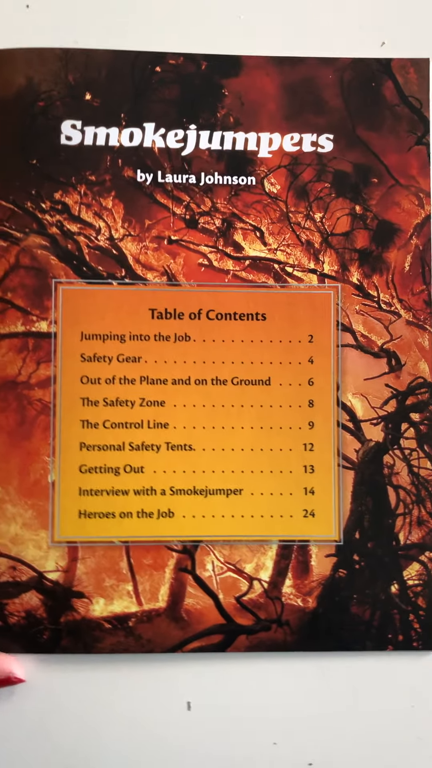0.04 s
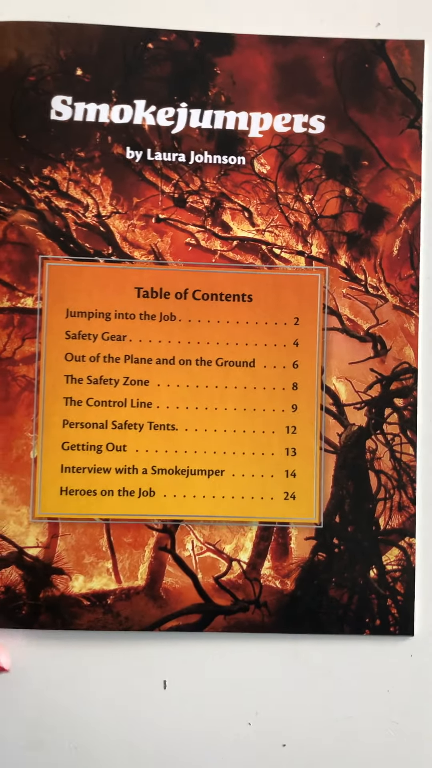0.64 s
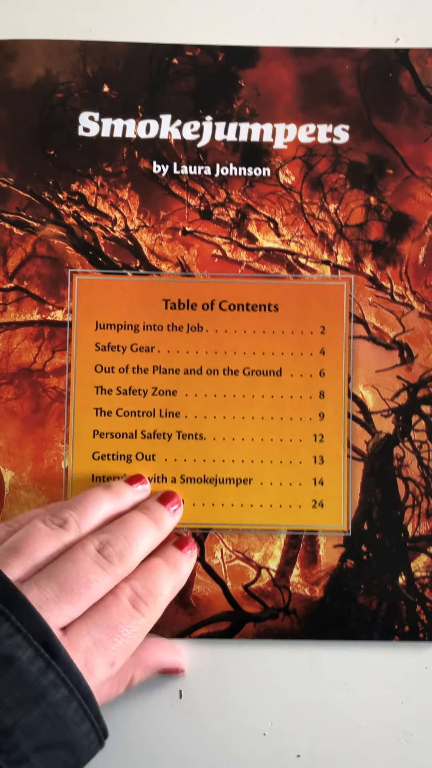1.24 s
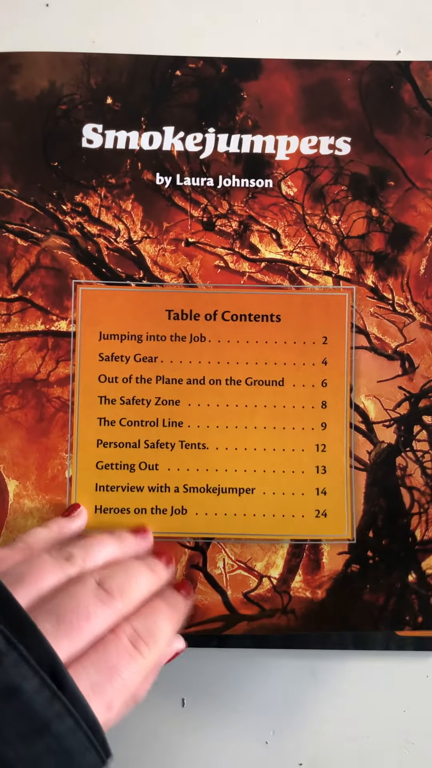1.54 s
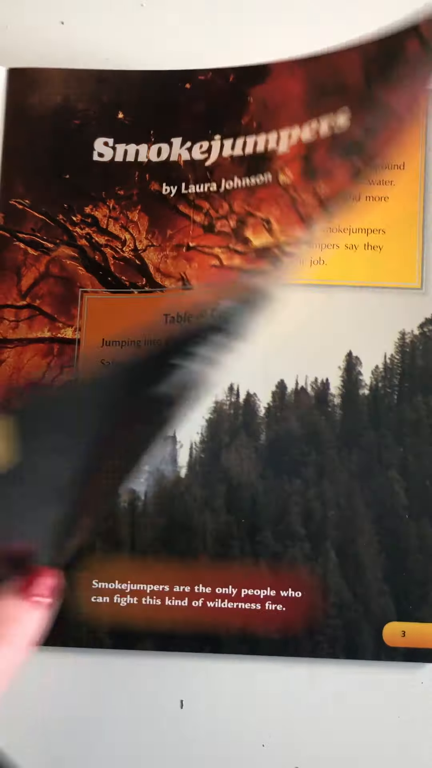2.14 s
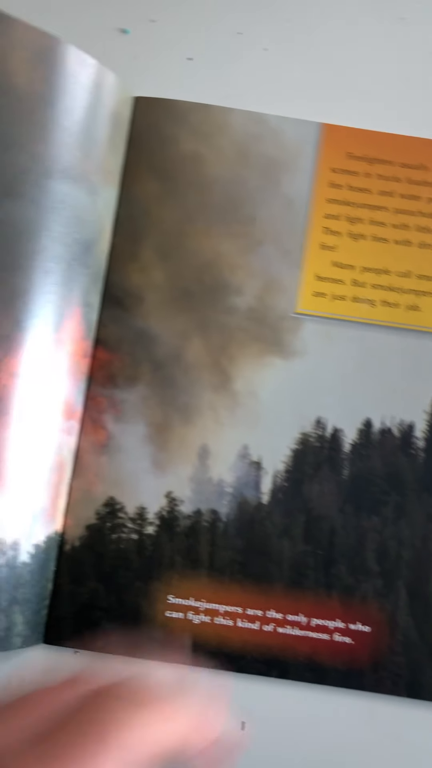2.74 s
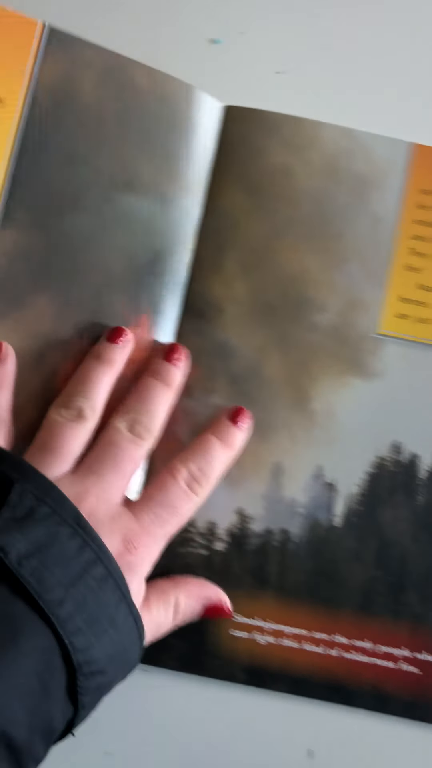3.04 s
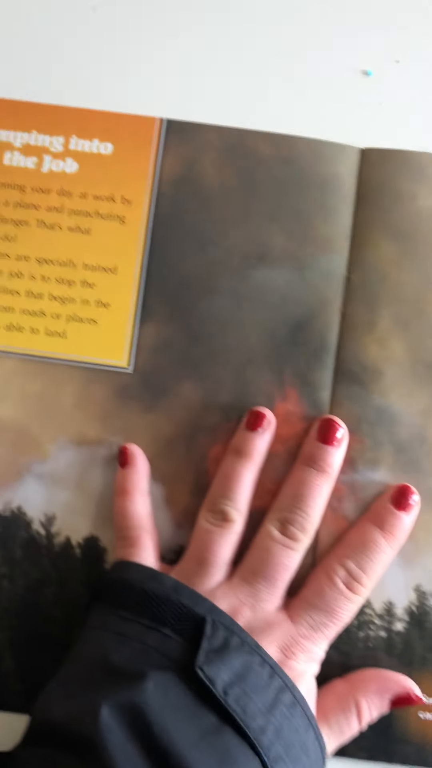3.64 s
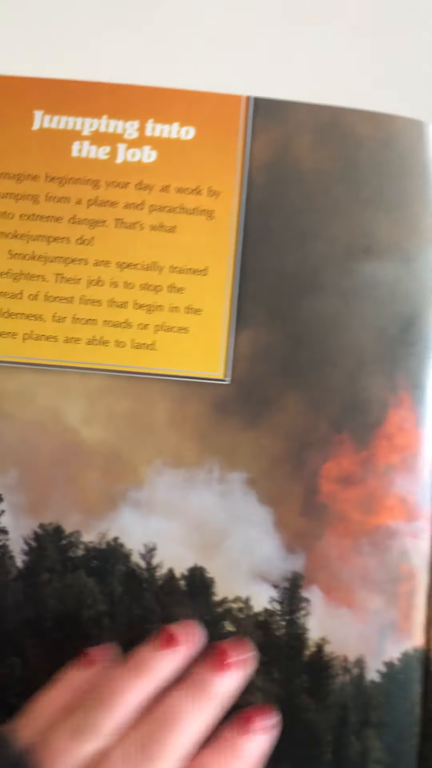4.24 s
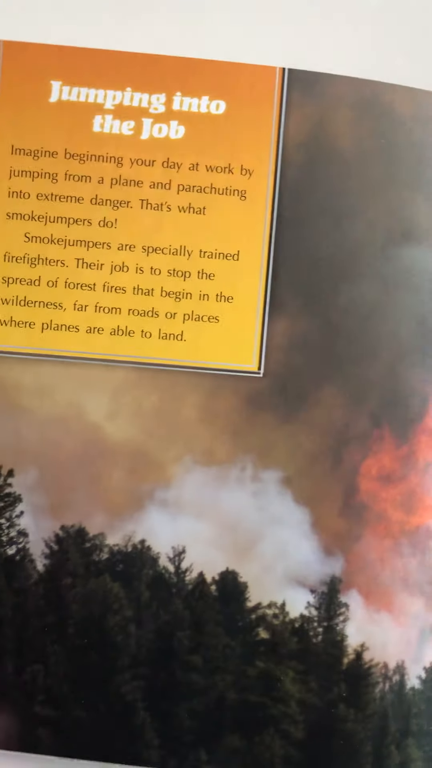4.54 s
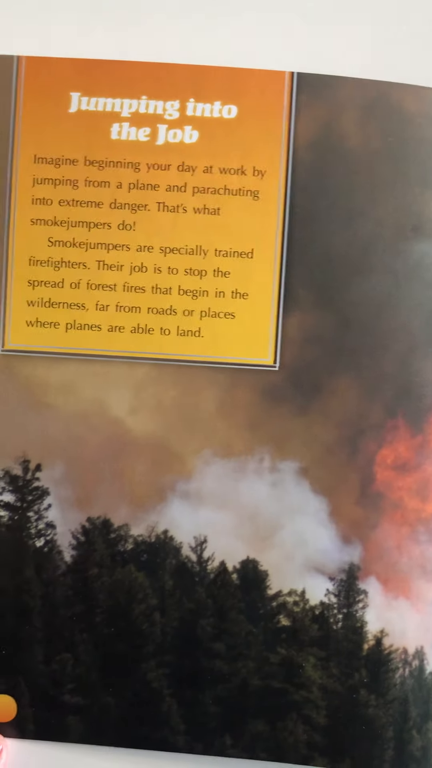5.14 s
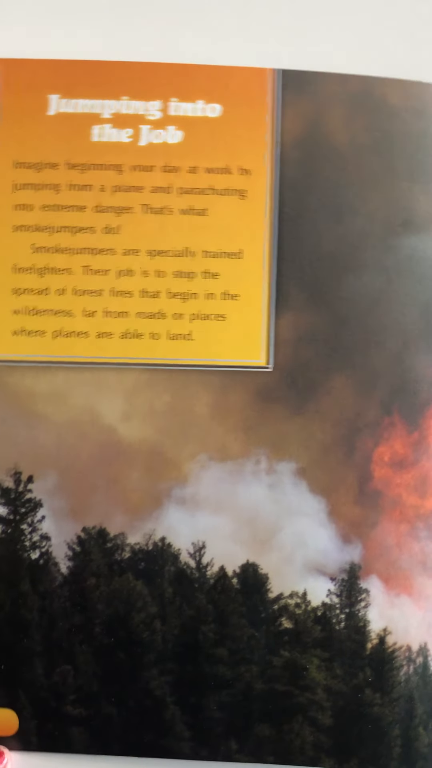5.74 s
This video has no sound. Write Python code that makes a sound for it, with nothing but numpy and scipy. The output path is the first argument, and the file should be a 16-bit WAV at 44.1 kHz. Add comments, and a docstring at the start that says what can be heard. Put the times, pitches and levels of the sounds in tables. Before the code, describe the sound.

Fingers scuff and flick a paper page over, pat it flat and slide away, followed by a small click in a quiet room.

```python
"""Turning a paperback page

A hand turns one glossy page of a thin book on a table, close by, in a quiet room with a faint hum.
Fingers stick and slip to the corner, page edges snap off the thumb, and the sheet slides over, creases
ticking, and lands with a puff of air. The palm pats it flat and slides away; then a small stiff part
clicks. Rubbing is coloured noise with catches; snaps, ticks, pats and clicks are struck resonances."""
import sys
import numpy as np
from scipy import signal
from scipy.fft import rfft, irfft
from scipy.io import wavfile

SR = 44100
rng = np.random.default_rng(int(sys.argv[2]) if len(sys.argv) > 2 else 0)


def dump(signal):
    """Clip the signal to [-1, 1] and save it as 16-bit WAV at the path in sys.argv[1]."""
    limited = np.clip(np.atleast_2d(signal).T, -1, 1)
    pcm = np.round(limited * 32767).astype(np.int16)
    wavfile.write(sys.argv[1], SR, pcm)


N = 254887
GRIP_S = 0.0061   # time to grip or let go
# modes of the small stiff part: f/Hz, width/Hz, level/dB
CLICK_MODES = [(400, 170, -8), (840, 400, -4), (1210, 130, 11.5), (2240, 210, -3), (3730, 310, 3),
               (4000, 210, -16)]


def from_db(db):
    """Decibels to gain."""
    return 10 ** (np.asarray(db) / 20)


def unit_rms(x):
    """Scale to rms 1."""
    return x / np.sqrt(np.mean(x ** 2) + 1e-20)


def butter(x, hz, kind, order=2):
    """Causal Butterworth filter."""
    return signal.sosfilt(signal.butter(order, np.clip(hz, 10, .45 * SR), kind, fs=SR, output="sos"), x)


def coloured(x, spectrum):
    """Shape by a (f/Hz, level/dB) curve; rms 1."""
    hz, db = np.transpose(spectrum)
    bins_hz = np.maximum(np.arange(N // 2 + 1) * SR / N, 1)
    return unit_rms(irfft(rfft(x) * from_db(np.interp(np.log(bins_hz), np.log(hz), db)), N))


def drift(rate_hz):
    """Smooth random wander, rms about 1."""
    hop, warmup = 40, 2000
    r = np.exp(-2 * np.pi * rate_hz * hop / SR)
    slow = signal.lfilter([1], [1, -2 * r, r * r], rng.standard_normal(N // hop + warmup + 2))[warmup:]
    return np.interp(np.arange(N) / hop, np.arange(len(slow)), unit_rms(slow))


def swell(middle_s, half_s):
    """Rounded rise and fall."""
    return np.exp(-np.minimum(np.abs((np.arange(N) / SR - middle_s) / half_s), 4) ** 3)


def resonate(x, hz, width_hz):
    """Resonance with peak gain 1."""
    r = np.exp(-np.pi * width_hz / SR)
    feedback = [1, -2 * r * np.cos(2 * np.pi * hz / SR), r * r]
    return signal.lfilter(np.array([1, 0, -1]) * (1 - r * r) / 2, feedback, x)


def add(track, at_s, peak_db, sound):
    """Mix in a short sound at a given peak level."""
    i = int(at_s * SR)
    track[i:i + len(sound)] += (from_db(peak_db) * sound / np.abs(sound).max())[:N - i]


def contact(scuff, t60_s, size=4096):
    """A sharp push, then a dying scuff of micro-contacts."""
    push = scuff * rng.standard_normal(size) * from_db(-60 * np.arange(size) / SR / t60_s)
    push[0] += 1
    return push


def disperse(x, corner_hz, stages):
    """Bending waves: the lows arrive after the highs."""
    a = np.exp(-2 * np.pi * corner_hz / SR)
    for _ in range(stages):
        x = signal.lfilter([-a, 1], [1, -a], x)
    return x


def struck(push, modes, tilt_db_per_decade, hollow=False):
    """Parallel modes, varied per blow; hollow ones start in step and cancel between their pitches."""
    out = np.zeros(len(push))
    for k, (hz, width_hz, db) in enumerate(modes):
        sign = 1 if hollow else (-1) ** k
        tilt_db = tilt_db_per_decade * np.log10(hz / modes[2][0])
        out += sign * from_db(db + tilt_db + rng.normal(0, 0.38)) * resonate(push, hz, width_hz)
    return out


def friction(catches_per_s, catch_db, spread_db):
    """Countless fibres slipping, with single larger catches."""
    sizes = from_db(spread_db * np.minimum(rng.exponential(1, N), 2)) * rng.choice([-1, 1], N)
    catches = sizes * (rng.random(N) < catches_per_s / SR)
    return rng.standard_normal(N) + from_db(catch_db) * unit_rms(catches)


def background(hum_hz=120.3):
    """Wavering mains hum over ventilation rumble and faint hiss."""
    # ventilation spectrum: f/Hz, density/dB
    rumble_colour = [(30, -8), (45, -4.5), (75, -1), (140, 2), (200, -4), (310, -6), (420, -17),
                     (700, -46.5)]
    # room air spectrum: f/Hz, density/dB
    air_colour = [(18, -50), (30, -25), (64, 4), (90, 2), (103, -3), (124, 6), (145, -2), (287, -21),
                  (319, -15.5), (364, -29.5), (486, -27), (554, -30), (600, -27.5), (649, -31.5),
                  (16000, -82)]
    # swell of hum and rumble: t/s, gain/dB
    hum_swell = [(0, -1.2), (3.2, 1.04), (5.78, -.4)]
    t = np.arange(N) / SR
    mains = from_db(.6 * drift(3)) * np.sin(2 * np.pi * hum_hz * t + .08 * drift(2))
    rumble = butter(coloured(rng.standard_normal(N), rumble_colour), 32, "high", order=4)
    air = butter(coloured(rng.standard_normal(N), air_colour), 314, "high", order=4)
    drone = from_db(-59) * unit_rms(mains) + from_db(-61) * rumble
    return drone * from_db(np.interp(t, *np.transpose(hum_swell))) + from_db(-69) * unit_rms(air)


def slide_levels(fade_db=21.5, sag_db_per_s=11.5, settle_s=4.3):
    """Flutter, scrape and hiss in dB: each slide swells, sags as it slows, and dies."""
    # hand or sheet sliding on paper; attack and release each span fade_db:
    # start/s, end/s, attack/s, release/s, scrape/dB, hiss/dB re scrape, flutter/dB re scrape
    slides = [(0.227, 0.353, 0.27, 1, -66.5, -8.5, -5), (0.563, 0.736, 0.096, 0.55, -64.5, -5, 1),
              (0.917, 1.115, 0.24, 0.44, -60, -1, -6.5), (1.522, 1.583, 0.18, 0.076, -64, -0.5, -4),
              (1.592, 1.695, 0.068, 0.4, -59.5, -6.5, -22), (1.897, 1.99, 0.15, 0.11, -56.5, -15, 3),
              (2, 2.063, 0.071, 0.19, -51.5, -6, -9), (2.148, 2.182, 0.26, 0.31, -51.5, 6, -5.5),
              (2.41, 2.59, 0.41, 0.1, -63.5, 8, -2), (2.698, 2.871, 0.14, 0.15, -51, 5, -7),
              (2.93, 3.222, 1, 0.22, -52.5, -5.5, -4.5), (3.55, 3.78, 1, 0.44, -56.5, -5, -6.5),
              (3.807, 3.972, 0.14, 0.78, -56.5, -4, -7.5), (4.087, 4.427, 0.26, 1, -48.5, -0.5, -8),
              (4.73, 5.068, 0.99, 0.091, -58, -3.5, -4)]
    t = np.arange(N) / SR
    settled_db = -np.clip((t - settle_s) / GRIP_S, 0, 1)
    restless_db = 1.8 * drift(6) + settled_db   # the hand is never quite still
    power = from_db(np.array([[-71], [-73], [-75]]) + restless_db) ** 2
    for start_s, end_s, attack_s, release_s, db, hiss_db, flutter_db in slides:
        fade = np.maximum(start_s - t, 0) / attack_s + np.maximum(t - end_s, 0) / release_s
        level = from_db(db - fade_db * np.minimum(fade, 10) - sag_db_per_s * np.maximum(t - start_s, 0))
        power += (level * from_db([[flutter_db], [0], [hiss_db]])) ** 2
    return 10 * np.log10(power)


def sliding(flutter_db, scrape_db, hiss_db):
    """Friction makes the sheet flutter, scrape, rasp and hiss; the contact pressure trembles."""
    # sliding paper spectrum: f/Hz, density/dB
    colour = [(150, -32), (250, -13), (303, 10), (336, 1.5), (452, 0), (560, -0.5), (640, 3), (802, 4),
              (1120, 0.5), (1530, 2), (4410, -5.5), (6140, -8), (9010, -10), (12500, -11), (14900, -8),
              (16000, -11.5)]
    rub = coloured(friction(catches_per_s=900, catch_db=-6.5, spread_db=8), colour)
    flutter = from_db(flutter_db - 1.5 + 2 * drift(26)) * unit_rms(butter(rub, [350, 1100], "band", 3))
    scrape = from_db(scrape_db - 3.5 + 0.3 * drift(37)) * unit_rms(butter(rub, [1150, 2800], "band", 3))
    grain = coloured(friction(catches_per_s=900, catch_db=-4, spread_db=6), colour)
    rasp_db = scrape_db - 3.5 + 0.13 * (hiss_db - scrape_db)
    rasp = from_db(rasp_db + 1.08 * drift(35)) * unit_rms(butter(grain, [2700, 6300], "band", 3))
    hiss = from_db(hiss_db + 0.55 + 0.87 * drift(19)) * unit_rms(butter(rub, 5470, "high", 4))
    return flutter + scrape + rasp + hiss


def singing():
    """Stick-slip gathers in a page resonance that glides as the sheet bends; the stiff part rubs too."""
    # page resonances: middle/s, half length/s, f/Hz, glide/(octaves/s), width/f, level/dB
    sings = [(0.22, .05, 1996, -0.5, 0.71, -68), (0.818, 0.038, 1450, 2.5, 0.36, -60),
             (1.657, 0.0073, 2050, 0, 0.28, -49.5), (1.669, .02, 5760, 0.5, 0.05, -55.5),
             (1.812, 0.018, 6000, 0, 0.074, -60), (2.04, 0.035, 4840, -3.5, 0.11, -56),
             (2.057, 0.014, 3090, -2, 0.24, -53.5), (2.178, 0.027, 1805, 2, 0.26, -52.5),
             (3.143, 0.22, 2830, 1, 0.072, -69), (4.099, 0.034, 2820, -0.5, 0.053, -53.5),
             (4.314, 0.068, 5420, 0, 0.18, -57.5)]
    t = np.arange(N) / SR
    slips = friction(catches_per_s=330, catch_db=-17, spread_db=10)
    part_rub = unit_rms(struck(slips, CLICK_MODES, tilt_db_per_decade=-5, hollow=True))
    out = from_db(-65.5) * swell(middle_s=5.316, half_s=0.078) * part_rub
    noise = rng.standard_normal((2, N))
    for middle_s, half_s, hz, octaves_per_s, rel_width, db in sings:
        octaves = octaves_per_s * np.clip(t - middle_s, -2 * half_s, 2 * half_s)
        phase = 2 * np.pi * np.cumsum(hz * 2 ** octaves) / SR
        in_phase, quadrature = butter(noise, rel_width * hz / 2, "low")
        band = unit_rms(in_phase * np.cos(phase) + quadrature * np.sin(phase))
        out += from_db(db) * swell(middle_s, half_s) * band
    return out


def stray_ticks(scrape_db, count=36, centre_hz=2120, scatter_octaves=0.81, width_hz=1600, crisp_db=-4):
    """Rows of faint random ticks, as strong as the paper is being rubbed."""
    rows = []
    for when, strength, pitch in rng.random((count, 3)):
        peak_db = scrape_db[int(when * N)] + 4 + 6 * strength
        hz = centre_hz * 2 ** (scatter_octaves * (2 * pitch - 1))
        rows.append((when * N / SR, peak_db, hz, width_hz, crisp_db))
    return rows


def ticks(scrape_db, burst_s=0.00052):
    """A crease flips: one paper resonance plus a few ms of cracking fibres."""
    # creases and edge ticks: t/s, peak/dB, f/Hz, width/Hz, crackle/dB re tone
    creases = [(0.251, -44.5, 1550, 700, -26), (0.418, -48.5, 3000, 3000, 10), (0.7009, -38, 1670, 3000, 6),
               (0.779, -53, 13500, 3000, 2), (.804, -39.5, 7900, 2000, -8), (.82, -39, 1340, 500, -1),
               (0.827, -48, 9500, 3000, -2), (.8355, -48, 7500, 2500, -7), (0.841, -40, 2160, 800, -7),
               (0.878, -43, 3900, 1500, 2), (0.99, -38, 1020, 1770, -5), (0.99, -46, 4360, 900, -10),
               (1.3, -46.5, 3020, 3000, -4), (1.674, -43, 5800, 1500, 2), (1.7569, -35, 850, 600, 0),
               (1.7845, -38.5, 820, 400, 1), (2.271, -40.5, 1480, 1790, -24),
               (2.3436, -35.5, 1600, 2160, -23), (2.424, -46, 1070, 1000, -23),
               (2.5, -41.5, 1520, 1000, -15), (2.597, -34.5, 1350, 900, -5), (2.678, -32, 1500, 1200, 4),
               (2.688, -38, 1580, 700, -12), (2.872, -34, 2140, 800, -22), (2.992, -35.5, 3160, 1800, -14),
               (3.008, -40, 3000, 1500, -16), (3.0311, -28.5, 2580, 500, -3),
               (3.0333, -37.5, 2290, 350, -25), (3.229, -41, 1590, 1200, -12),
               (3.529, -34.5, 1740, 1790, -14), (3.891, -37.5, 1850, 1200, -5),
               (3.9086, -31.5, 3800, 905, 4), (3.9254, -30, 1950, 450, 1), (3.9237, -36, 3740, 700, -13),
               (3.9242, -27.5, 11600, 2500, 5), (4.0027, -36.5, 1840, 450, -12),
               (4.0028, -31, 15200, 2000, -22), (4.171, -38, 2500, 600, -14), (4.563, -31, 1590, 1990, -21),
               (4.62, -34, 4770, 3500, -19), (4.621, -37, 1200, 1100, -22.5)]
    out = np.zeros(N)
    age = np.arange(4096) / SR / burst_s
    for at_s, db, hz, width_hz, crisp_db in creases + stray_ticks(scrape_db):
        tone = resonate(contact(scuff=0.034, t60_s=0.048), hz, width_hz)
        tone = resonate(tone, hz, np.hypot(0.33 * hz, width_hz))
        crackle = butter(rng.standard_normal(len(age)) * age * np.exp(-age), 870, "high")
        tick = tone / np.abs(tone).max() + from_db(crisp_db) * crackle / np.abs(crackle).max()
        add(out, at_s, db, disperse(tick, corner_hz=1400, stages=2))
    return out


def fingertips(split_hz=5200):
    """Skin sticks and slips on coated paper in short, grainy strokes."""
    # fingertip drags: start/s, end/s, level/dB, treble/dB
    strokes = [(0.78, 0.809, -59.5, 3), (0.814, 0.845, -57.5, -4), (1.299, 1.328, -66.5, -1),
               (1.599, 1.624, -53, 2), (1.625, 1.639, -50, 1), (1.644, 1.664, -55, -6),
               (1.667, 1.692, -52, -1), (1.711, 1.737, -52, -3), (1.756, 1.764, -49, 2),
               (1.777, 1.798, -50, -1), (1.8, 1.839, -50, -0.5), (1.956, 1.973, -48, -1.5),
               (4.911, 4.972, -65.5, 11), (5.275, 5.394, -72.5, 5)]
    # fingertip rasp spectrum: f/Hz, density/dB
    colour = [(350, -40), (750, 0), (1150, -16), (1550, 2.5), (2000, -1.5), (2600, 0.5), (3600, -1),
              (4900, -6), (5900, -6), (7000, -6), (8200, -10.5), (9400, -12), (11000, -14.5), (16000, -17)]
    t, out = np.arange(N) / SR, np.zeros(N)
    rasp = coloured(friction(catches_per_s=1100, catch_db=-0.5, spread_db=3.5), colour)
    body = butter(rasp, split_hz, "low", order=3)
    treble = butter(rasp, split_hz, "high", order=3)
    for start_s, end_s, db, treble_db in strokes:
        pressure = np.clip(np.minimum(t - start_s, end_s - t) / GRIP_S + .5, 0, 1)
        out += from_db(db) * pressure * (body + from_db(treble_db) * treble)
    return out * from_db(1.9 * drift(110))


def snaps(top_hz=7200, bottom_hz=480, thump_hz=205):
    """A freed edge whips the sheet: a dry falling crack, a thump as the book nods, a trace of crackle."""
    # edges leaving the thumb: t/s, peak/dB, tilt/(dB/decade), crackle/dB re peak
    releases = [(1.8506, -24.5, -3, -14.5), (1.8746, -21, -2.5, -19), (1.9026, -19.5, -2, -16.5),
                (1.9321, -22.5, -9.5, -16)]
    # modes of the bent sheet: f/Hz, width/Hz, level/dB
    sheet_modes = [(727, 165, -1), (1600, 410, 1), (2640, 330, 0), (3800, 250, -2.5), (6350, 660, -12.5)]
    out = np.zeros(N)
    for at_s, db, tilt, crackle_db in releases:
        push = contact(scuff=.06, t60_s=.006)
        whip = butter(struck(push, sheet_modes, tilt), top_hz, "low", order=6)
        whip = butter(whip, bottom_hz, "high", order=3)
        add(out, at_s, db, disperse(whip, corner_hz=1270, stages=5))
        nod = resonate(push, thump_hz, width_hz=53)
        add(out, at_s, db - 25, resonate(nod, thump_hz, width_hz=thump_hz))
        fibres = contact(scuff=1, t60_s=.03)
        add(out, at_s, db + crackle_db, butter(fibres, 4700, "high"))
    return out


def puffs():
    """Escaping air flaps the sheet in a soft, dull rush."""
    # air from under the sheet: middle/s, half length/s, low/Hz, high/Hz, level/dB
    rushes = [(1.987, 0.028, 455, 1190, -55.5), (2.688, 0.014, 500, 1700, -48),
              (2.8, 0.14, 161, 514, -64.5), (3.064, 0.0033, 740, 1250, -41.5),
              (3.071, .033, 260, 1230, -51.5), (4.14, 0.11, 150, 330, -65)]
    air = rng.standard_normal(N)
    return sum(from_db(db) * swell(middle_s, half_s) * unit_rms(butter(air, [low_hz, high_hz], "band", 3))
               for middle_s, half_s, low_hz, high_hz, db in rushes)


def pats():
    """Soft contacts push out air in a dull, damped note; the book thumps on the table."""
    # page and hand landing on the book: t/s, peak/dB, f/Hz, t60/s
    landings = [(2.2718, -47, 503, 0.02), (2.3442, -44.5, 675, 0.015), (2.693, -47, 473, 0.047),
                (3.035, -40, 770, 0.03), (3.061, -33.5, 940, 0.028), (3.09, -42, 900, 0.023),
                (3.1265, -38.5, 950, 0.006), (3.5438, -40, 328, 0.05), (3.583, -48, 400, 0.028),
                (3.592, -45, 330, 0.13), (3.664, -48, 800, .012), (3.926, -48, 330, 0.031),
                (4.081, -43.5, 284, 0.058), (4.117, -46, 156, 0.18), (4.162, -41.5, 780, 0.016),
                (4.185, -47, 720, 0.014), (4.255, -42.5, 940, 0.05)]
    out = np.zeros(N)
    for at_s, db, hz, t60_s in landings:
        note = resonate(contact(scuff=0.12, t60_s=t60_s), hz, width_hz=0.6 * hz)
        note = resonate(note, hz, width_hz=hz)
        add(out, at_s, db, butter(note, 0.79 * hz, "low"))
        thump = resonate(note, hz=171, width_hz=260)
        add(out, at_s, db - 10.5, thump)
    return out


def clicks():
    """A small stiff part rings hollowly for a few ms; a soft contact stirs only its lower modes."""
    # hard click and after-touches: t/s, peak/dB, low-pass/Hz
    touches = [(5.2653, -27.5, 7000), (5.3409, -43, 1300), (5.372, -48, 5000)]
    out = np.zeros(N)
    for at_s, db, top_hz in touches:
        ring = struck(contact(scuff=.06, t60_s=.008), CLICK_MODES, tilt_db_per_decade=0, hollow=True)
        add(out, at_s, db, disperse(butter(ring, top_hz, "low"), corner_hz=2000, stages=3))
    return out


def table_echo(x, delay_s=.0007, echo_db=-11):
    """Direct sound plus its reflection off the table; the delay wanders as hand and sheet move."""
    n, gain = np.arange(N), from_db(echo_db)
    delay_samples = delay_s * SR * np.exp(.3 * drift(2.1))
    return (x + gain * np.interp(n - delay_samples, n, x)) / np.hypot(1, gain)


def room(x, t60_s=0.38, level_db=-22.5, wall_cut_hz=4500):
    """Short, dull, diffuse tail from the walls."""
    t = np.arange(SR // 2) / SR
    decay = from_db(-60 * t / t60_s) * (t > .004)
    tail = butter(rng.standard_normal(len(t)) * decay, wall_cut_hz, "low")
    return from_db(level_db) * signal.fftconvolve(x, tail / np.linalg.norm(tail))[:N]


def scene():
    """Book, room and background, alike in both channels."""
    flutter_db, scrape_db, hiss_db = slide_levels()
    rubbing = table_echo(sliding(flutter_db, scrape_db, hiss_db) + fingertips())
    book = rubbing + singing() + snaps() + ticks(scrape_db) + pats() + puffs() + clicks()
    return np.tile(book + room(book) + background(), (2, 1))


def record(dry):
    """Steep low-pass."""
    cutoff_hz = 15950
    return signal.sosfilt(signal.ellip(12, .1, 80, cutoff_hz, fs=SR, output="sos"), dry)


dry = scene()
out = record(dry)
dump(out)
```